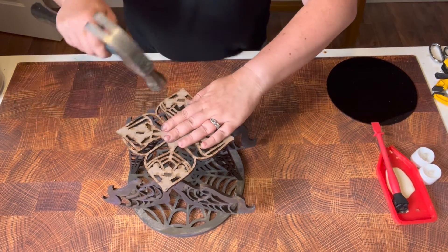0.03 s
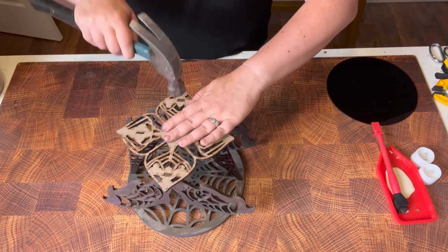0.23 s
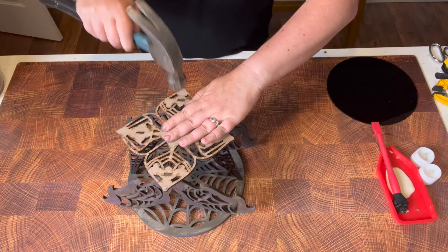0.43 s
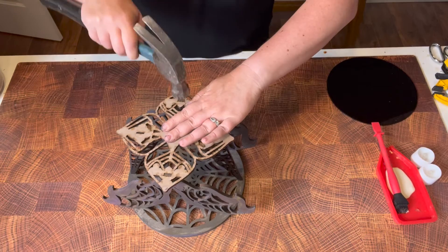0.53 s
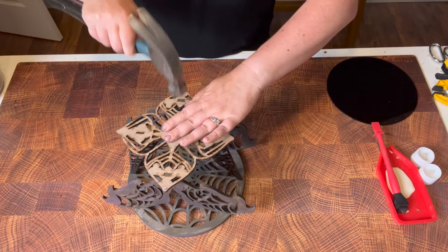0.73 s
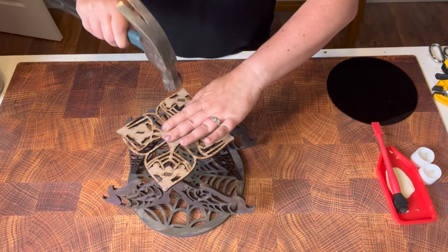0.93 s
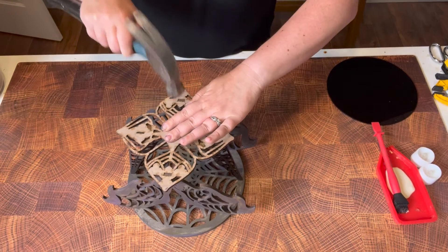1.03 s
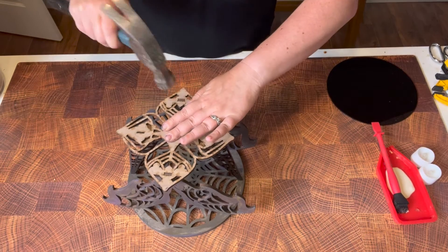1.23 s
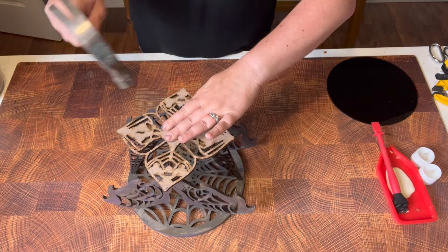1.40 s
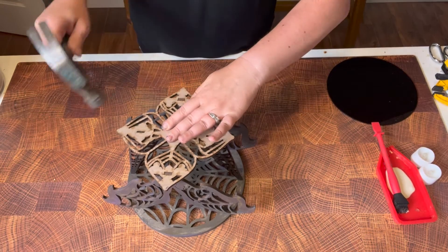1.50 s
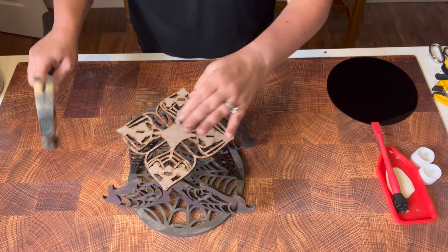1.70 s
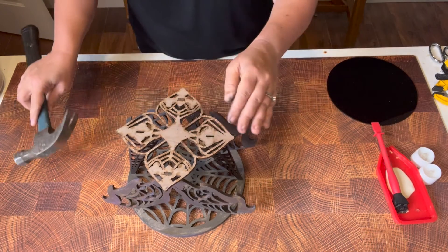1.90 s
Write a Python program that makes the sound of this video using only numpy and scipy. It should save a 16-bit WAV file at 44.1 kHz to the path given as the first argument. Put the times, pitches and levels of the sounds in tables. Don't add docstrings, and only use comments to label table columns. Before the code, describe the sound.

A hammer strikes a thin wooden piece four times at an even, quick pace on a thick wooden board, with small rattling rebounds, then it is laid down softly; quiet room, close stereo microphone.

```python
import sys
import numpy as np
from scipy import signal
from scipy.fft import rfft, irfft
from scipy.io import wavfile

SR = 44100
rng = np.random.default_rng(int(sys.argv[2]) if len(sys.argv) > 2 else 0)


def unload_wav(signal):
    wavfile.write(
        sys.argv[1],
        SR,
        np.round(np.clip(np.atleast_2d(signal).T, -1, 1) * 32767).astype(np.int16),
    )


def magnitude_from_level(level_db):
    exponent = np.asarray(level_db, float) / 20
    return 10 ** exponent


N = 85995
SPAN = 36000


def evened(x):
    return x / np.sqrt(np.mean(x ** 2) + 1e-20)


def read(points, hz):
    f, value = np.transpose(points)
    return np.interp(np.log(hz + 1), np.log(f + 1), value)


def add(mix, s, sound):
    part = mix[..., round(s * SR):][..., :sound.shape[-1]]
    part += sound[..., :part.shape[-1]]


def shaped(x, gain):
    return irfft(rfft(x) * gain(np.fft.rfftfreq(x.shape[-1], 1 / SR)), x.shape[-1])


def coloured(noise, colour):
    return evened(shaped(noise, lambda f: magnitude_from_level(read(colour, f))))


def burst(noise, colour, tilt_db, air_db, lag, rise, t60):
    t = np.arange(len(noise)) / SR
    hz = np.fft.rfftfreq(len(noise), 1 / SR)
    octaves = np.log2((hz + 1) / 1000)
    tilt = magnitude_from_level(tilt_db * octaves + air_db * (hz > 9000))
    spectrum = rfft(coloured(noise, colour)) * tilt
    out = np.zeros(len(noise))
    for centre in np.arange(-14, 14) / 3:
        f = 1000 * 2 ** centre
        band = np.cos(np.pi / 2 * np.clip(3 * (octaves - centre), -1, 1)) ** 2
        since = np.maximum(t - lag(f), 0)
        swell = 1 - np.exp(-since / rise(f))
        out += irfft(spectrum * band, len(noise)) * swell * magnitude_from_level(-60 * since / t60(f))
    return out


def modes(table, lag, spread):
    hz, db, t60 = np.transpose(table)[:, :, None]
    hz = hz * (1 + spread * rng.uniform(-0.31, 1, hz.shape))
    since = np.maximum(np.arange(SPAN) / SR - lag(hz), 0)
    swell = 1 - np.exp(-since * hz / 0.49)
    return (magnitude_from_level(db - 60 * since / t60) * swell * np.sin(2 * np.pi * hz * since)).sum(0)


def travel_time(hz):
    return 0.0045 * (200 / hz) ** 0.5


def hum():
    # (frequency [Hz], level [dB])
    hum_bands = [(98, -64), (182, -67)]
    # (time [s], gain [dB])
    hum_lift = [(0, -13), (.3, -25), (1.2, 3.1), (1.7, 0.7), (1.82, 4.5), (1.95, -7)]
    lift_db = np.interp(np.arange(N) / SR, *np.transpose(hum_lift))
    out = np.zeros(N)
    for hz, db in hum_bands:
        band = shaped(rng.standard_normal(N), lambda f: 1 / (1 + ((f - hz) / 9) ** 2))
        out += magnitude_from_level(db + lift_db) * evened(band)
    return out


def sleeve():
    centre_hz, half_width_hz, fade_s = 702.5, 157.5, 0.065
    rub = shaped(rng.standard_normal(N), lambda f: np.exp(-((f - centre_hz) / half_width_hz) ** 2))
    return magnitude_from_level(-71.5) * evened(rub) * np.exp(-(np.arange(N) / SR / fade_s) ** 2)


def hush():
    # (frequency [Hz], level [dB])
    mid_colour = [(25, -9.5), (60, -0.5), (97, -2), (140, -14.5), (300, -17), (880, -26.5), (1000, -32),
                  (7500, -46.5), (9000, -75.5)]
    side_colour = [(15, -48.5), (25, -17), (49, -6), (152, -16.5), (712, -7.5), (1270, -22.5), (9500, -35),
                   (13000, -47)]
    # (time [s], gain [dB])
    lift = [(0, -2.3), (.25, -3.5), (1.4, 9), (1.7, 2.5), (1.8, -1), (1.95, 0.5)]
    a, b = rng.standard_normal((2, N))
    mid = magnitude_from_level(-62) * coloured(a, mid_colour) + hum() + sleeve()
    side = magnitude_from_level(-72) * coloured(b, side_colour)
    return np.array([mid, side]) * magnitude_from_level(np.interp(np.arange(N) / SR, *np.transpose(lift)))


def ring(db, tilt_db, air_db, shared):
    # (frequency [Hz], level [dB])
    mid_colour = [(60, -21), (256, -8), (862, -22.5), (2410, -25), (7900, -44), (8500, -85), (10000, -87),
                  (10600, -48), (15700, -51)]
    side_colour = [(35, -46), (60, -21), (486, 0.5), (532, -2), (2630, -9), (3770, -19.5), (10100, -20.5),
                   (11900, -30.5), (13000, -65.5)]
    # (frequency [Hz], time to fall 60 dB [s])
    ring_t60 = [(120, 0.54), (330, 0.4), (870, 0.5), (2300, 0.41), (6000, 0.39), (11000, 0.37),
                (15500, 0.17)]
    alike = 0.41
    chatter_db, chatter_s, chatter_lasts_s = 4.5, 0.003, 0.026
    brace_db, brace_hz, brace_width_hz = 5.5, 2400, 200
    law = (lambda f: 0.002 + travel_time(f), lambda f: 0.0026, lambda f: read(ring_t60, f))
    t = np.arange(shared.shape[1]) / SR
    lumps = np.interp(t, np.arange(400) * chatter_s, rng.standard_normal(400)) * np.exp(-t / chatter_lasts_s)
    noise = alike * shared + np.sqrt(1 - alike ** 2) * rng.standard_normal(shared.shape)
    a, b = noise * magnitude_from_level(chatter_db * lumps)
    a = shaped(a, lambda f: magnitude_from_level(brace_db * np.exp(-((f - brace_hz) / brace_width_hz) ** 2)))
    mid = burst(a, mid_colour, tilt_db, air_db, *law)
    side = magnitude_from_level(-7.5) * burst(b, side_colour, tilt_db, 0, *law)
    return magnitude_from_level(db) * np.array([mid, side])


def crack(db, tilt_db, air_db):
    # (frequency [Hz], level [dB])
    mid_colour = [(500, -5.5), (1100, -3), (2000, -1), (4000, -8.5), (6500, -10), (8900, -28), (11500, -18),
                  (16200, -21)]
    side_colour = [(180, -39.5), (300, -11), (2520, -6.5), (4240, -26), (6450, -5.5), (7130, -6),
                   (9330, -4.5), (16500, -43.5)]
    law = (lambda f: 0.0014 * min(1000 / f, 2) ** 2,
           lambda f: 0.00015 + 0.5 / f,
           lambda f: 0.061 * min(1000 / f, 1.5) ** 0.6)
    a, b = rng.standard_normal((2, SPAN // 6))
    fade = np.linspace(1, 0, SPAN // 6)
    mid = burst(a, mid_colour, tilt_db, air_db, *law)
    side = magnitude_from_level(-5) * burst(b, side_colour, tilt_db, 0, *law)
    return magnitude_from_level(db) * fade * np.array([mid, side])


def knock():
    knock_modes = [(250.9, 0, 0.47), (278, -4, 0.5), (690, -8, 0.05), (2700, -32, 0.3), (4900, -28, 0.08)]
    held_s = 0.119
    return modes(knock_modes, lambda f: 0 * f, 0) * np.exp(-(np.arange(SPAN) / SR / held_s) ** 4)


def touches(mix, shared):
    # (time [s], tick [dB], knock [dB], ring [dB])
    contacts = [
        (1.385, -52.5, -75, -59),
        (1.507, -63, -68, -70),
        (1.602, -56.5, -66.5, -61.5),
        (1.611, -50, -43.5, -72),
        (1.776, -82, -66, -93),
    ]
    for s, tick_db, knock_db, ring_db in contacts:
        add(mix, s, crack(tick_db, 0.27, -7))
        add(mix, s, ring(ring_db, 2.5, -5.5, shared[::-1, :SPAN // 2]))
        add(mix[0], s, magnitude_from_level(knock_db) * knock())


def late_cracks(mix):
    # (time [s], level [dB])
    weaker_cracks = [
        (.552, -25),
        (0.836, -19.5),
        (0.963, -41),
        (1.133, -24),
    ]
    for s, db in weaker_cracks:
        add(mix, s, crack(db, 0.0026, 2))


def lead_in(db):
    lasts_s = 0.014
    t = np.arange(0, lasts_s, 1 / SR)
    fuzz = shaped(rng.standard_normal((2, 2000)), lambda f: (f > 924) * (f < 4260))[:, :len(t)]
    sound = magnitude_from_level(db) * fuzz * np.sin(np.pi / 2 * t / lasts_s) * magnitude_from_level([[0], [-7]])
    return sound, lasts_s


def head():
    # (frequency [Hz], level [dB], time to fall 60 dB [s])
    head_tones = [(2176, -0.5, 0.16), (2294, -2, .35), (2660, -5, .3)]
    return modes(head_tones, lambda f: 0.005 * rng.random(f.shape), 0.0083)


def piece():
    # (frequency [Hz], level [dB], time to fall 60 dB [s])
    piece_tones = [(1310, -5.5, 0.043), (1594, 1, .03), (1890, -3.5, .03)]
    return modes(piece_tones, lambda f: 0.0038 + 0 * f, 0.035)


def pushes():
    # (delay [s], level [dB], sign, frequency [Hz])
    jolts = [
        (.0048, -7, 1, 340),
        (.0071, -2, -1, 290),
        (.0102, 1, 1, 200),
        (.0131, 3, -1, 160),
        (.0162, -5, 1, 170),
        (.0244, 3, -1, 240),
        (.0439, 0, 1, 180),
        (.06, -4, 1, 170),
    ]
    late, db, sign, hz = np.transpose(jolts)[:, :, None]
    cycles = (np.arange(SPAN // 8) / SR - late) * hz
    return (np.sign(sign) * magnitude_from_level(db) * np.cos(2 * np.pi * cycles) * np.exp(-(cycles / 0.34) ** 2)).sum(0)


def thump():
    # (frequency [Hz], level [dB], time to fall 60 dB [s])
    table_tones = [(42, -23, 0.48), (73.17, -2, .4), (100.6, -7.5, 0.4), (117.3, -2.5, .36),
                   (165, -4, 0.03), (184.6, -8.5, .25), (249.3, -19.5, 0.71), (300, -21.5, .3),
                   (375.8, -20, 0.55), (416.3, -17.5, 0.37), (522, -31, 0.2), (569.4, -16.5, .25),
                   (678, -33, 0.18)]
    out = modes(table_tones, travel_time, 0.01)
    add(out, 0, magnitude_from_level(1.5) * pushes())
    return out


def blows(mix, shared):
    # (time [s], crack [dB], thump [dB], ring [dB], tilt [dB per octave])
    hits = [
        (0.2393, -15.5, -11.5, -21, 0.44),
        (0.5289, -8, -10, -17.5, 0.5),
        (.813, -10.5, -9.5, -15.5, 1.1),
        (1.1077, -8, -9.5, -15.5, 1.0),
    ]
    head_levels = [-27, -31.5, -31.5, -34.5]
    air_levels = [2.5, -3, -2, -0.5]
    piece_levels = [-20, -10, -13.5, -13.5]
    for hit, head_db, air_db, piece_db in zip(hits, head_levels, air_levels, piece_levels):
        s, crack_db, thump_db, ring_db, tilt_db = hit
        lead_noise, lead_s = lead_in(crack_db - 23)
        add(mix, s - lead_s, lead_noise)
        add(mix, s, crack(crack_db, tilt_db, air_db))
        add(mix[0], s, magnitude_from_level(head_db) * head())
        add(mix[0], s, magnitude_from_level(piece_db) * piece())
        add(mix[0], s, magnitude_from_level(thump_db) * thump())
        add(mix, s, ring(ring_db, tilt_db / 2, air_db, shared))


def scene():
    # (frequency [Hz], share of the middle added to the side)
    lean = [(60, .01), (200, 0.067), (500, 0.23), (1500, .13), (3000, 0.069), (6000, -.02)]
    mix = hush()
    shared = rng.standard_normal((2, SPAN))
    touches(mix, shared)
    late_cracks(mix)
    blows(mix, shared)
    mid, side = mix
    side = side + shaped(mid, lambda f: read(lean, f))
    return np.array([mid + side, mid - side])


def low_pass(x):
    return signal.sosfilt(signal.butter(12, 17000, fs=SR, output="sos"), x)


def record(dry):
    low_hz, high_hz = 30, 15900
    x = shaped(dry, lambda f: f ** 2 / (f ** 2 + low_hz ** 2))
    x = x / (1 + abs(x) ** 6) ** (1 / 6)
    x = signal.oaconvolve(x, signal.firwin(127, high_hz, fs=SR)[None], "same")
    return low_pass(x)


dry = scene()
out = record(dry)
unload_wav(out)
```